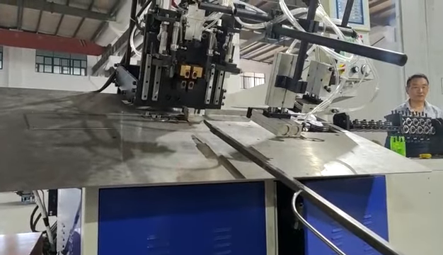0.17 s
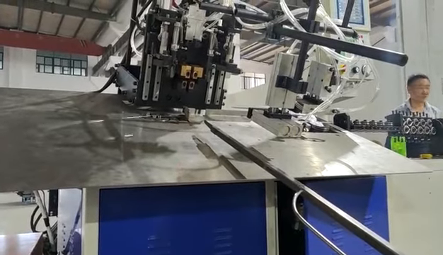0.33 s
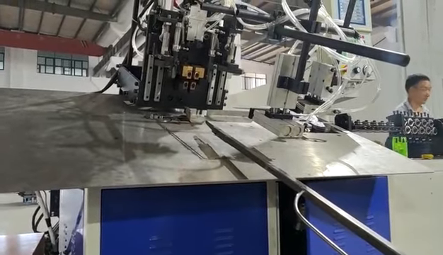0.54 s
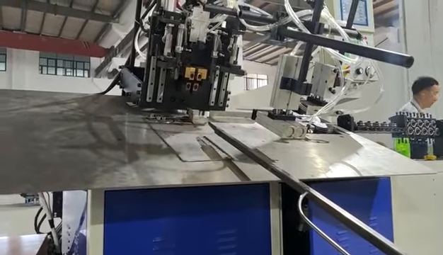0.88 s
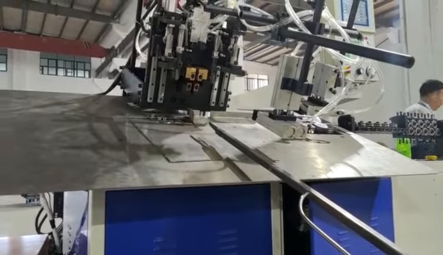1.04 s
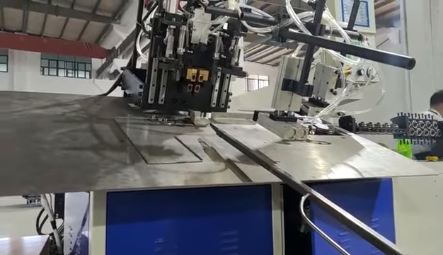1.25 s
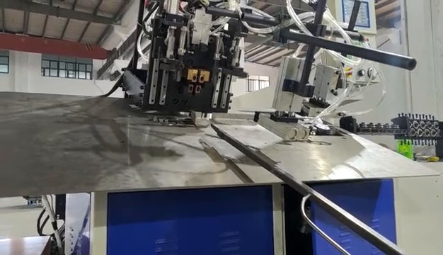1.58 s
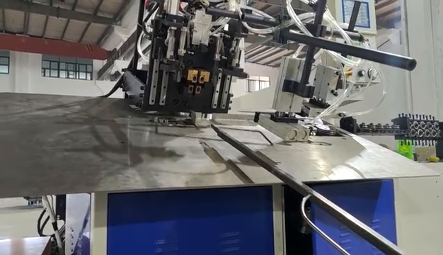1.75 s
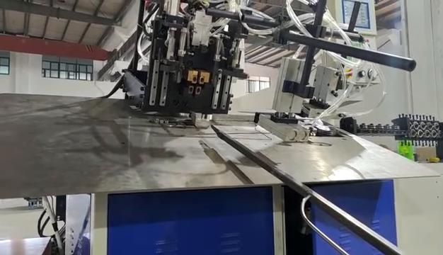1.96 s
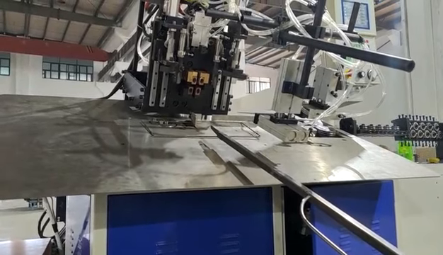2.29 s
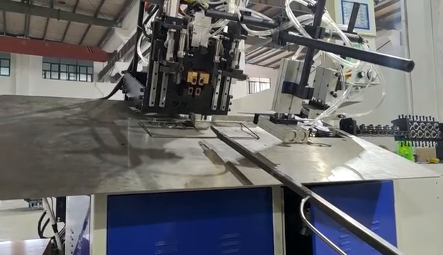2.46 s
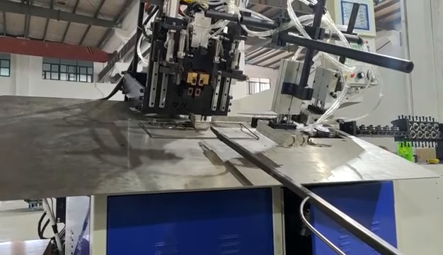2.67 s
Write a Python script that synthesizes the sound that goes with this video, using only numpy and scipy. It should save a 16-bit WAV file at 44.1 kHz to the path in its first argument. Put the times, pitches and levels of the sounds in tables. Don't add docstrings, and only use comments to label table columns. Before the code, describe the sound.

A wire bending machine clanks once early, hisses and rattles lightly, pauses, then bursts into sharp metal clinks, air puffs and thuds, ending in a falling exhaust whistle; large droning hall, dull stereo pickup nearby.

```python
import sys
import numpy as np
from scipy import signal
from scipy.fft import rfft, irfft
from scipy.io import wavfile
from scipy.ndimage import uniform_filter1d

SR = 44100
rng = np.random.default_rng(int(sys.argv[2]) if len(sys.argv) > 2 else 0)


def attenuation_scalar(level_db):
    decades = np.asarray(level_db, float) / 20
    return 10 ** decades


def dump_mix(stems):
    frames = np.atleast_2d(stems).T
    limited = np.clip(frames, -1, 1)
    pcm = np.round(limited * 32767).astype(np.int16)
    wavfile.write(sys.argv[1], SR, pcm)


N = 124803


def evened(x):
    return x / np.sqrt(np.mean(x ** 2) + 1e-20)


def read(points, hz):
    f, value = np.transpose(points)
    return np.interp(np.log(hz + 1), np.log(f + 1), value)


def sides(pan_db):
    return attenuation_scalar(np.array([[pan_db / 2], [-pan_db / 2]]))


def gate(start, rise, hold, t60):
    t = np.arange(N) / SR - start
    release = attenuation_scalar(-60 * np.maximum(t - hold, 0) / t60)
    return np.clip(t / rise, 0, 1) * release


def resonate(x, hz, width):
    turn = np.exp(2j * np.pi * np.cumsum(hz * np.ones(N)) / SR)
    r = np.exp(-np.pi * width / SR)
    smooth = signal.lfilter([1 - r], [1, -r], x / turn + 1e-18)
    return 2 * (turn * smooth).real


# frequency in Hz, left minus right in dB.
PORT_TILT = [(60, 0), (1700, -.3), (2500, 1.5), (3300, -.8), (4500, -1.5), (5500, 2), (6500, 3.5),
             (7500, 4)]
# frequency in Hz, correlation.
PORT_LIKENESS = [(30, .9995), (100, .998), (200, .968), (400, .84), (800, .4), (1550, -.38), (2100, .08),
                 (3000, -.05)]


def ports(left, other, hz):
    same = read(PORT_LIKENESS, hz)
    tilt = attenuation_scalar(read(PORT_TILT, hz) / 2)
    right = same * left + np.sqrt(1 - same ** 2) * other
    return np.array([left * tilt, right / tilt])


def wash(colour_db, size, patchy_db, flicker_db):
    frames, hz = 4 * N // size + 5, np.fft.rfftfreq(size, 1 / SR)
    a, b, c, d, patches = rng.standard_normal((5, frames, len(hz)))
    patches = uniform_filter1d(patches, size=size // 80, axis=1)
    patches = evened(uniform_filter1d(patches, size=8000 // size, axis=0))
    flicker = evened(uniform_filter1d(rng.standard_normal(frames), size=6000 // size))[:, None]
    level_db = colour_db(hz) + patchy_db * patches + flicker_db * flicker
    z = ports(a + 1j * b, c + 1j * d, hz) * attenuation_scalar(level_db)
    noise = signal.istft(z.transpose(0, 2, 1), nperseg=size, noverlap=3 * size // 4)[1]
    return evened(noise[:, :N])


# frequency in Hz, level in dB per Hz.
DRONE_COLOUR = [(30, -31.5), (65, -5), (250, -7), (700, -10.5), (1100, -13), (2200, -13.5), (4600, -19),
                (7500, -22.5)]
# frequency in Hz, width in Hz, boost in
# dB (negative for the dip).
HALL_HUMS = [(122.7, 11.7, 9.5), (270, 174, 6.5), (648, 130, 2), (1052, 270, -5)]


def drone():
    def colour_db(hz):
        hums = sum(db / (1 + (2 * (hz - f) / w) ** 2) for f, w, db in HALL_HUMS)
        return read(DRONE_COLOUR, hz) + hums
    return attenuation_scalar(-19) * wash(colour_db, size=2048, patchy_db=1.0, flicker_db=0.44)


# frequency in Hz, level in dB per Hz.
LEAK_HISS = [(1000, -12), (2500, -3), (4500, -5), (6500, 0), (7600, 1)]
# time in seconds, level in dB.
LEAK_DRIFT = [(0, -19), (0.248, -17.5), (0.649, -64.5), (.9, -16), (1.151, -20), (1.298, -25),
              (1.45, -50.5), (1.719, -53), (2.2, -41.5), (2.55, -52.5), (2.83, -59.5)]


def leak():
    s, db = np.transpose(LEAK_DRIFT)
    hiss = wash(lambda hz: read(LEAK_HISS, hz) - 60 * (hz < 700), size=512, patchy_db=1.2, flicker_db=.4)
    return hiss * attenuation_scalar(np.interp(np.arange(N) / SR, s, db)) * sides(2.5)


def flow(bursts):
    return np.sqrt(sum((attenuation_scalar(db) * gate(s, rise, hold, t60)) ** 2 for s, rise, hold, t60, db in bursts))


# frequency in Hz, level in dB per Hz.
VENT_COLOUR = [(150, -42.5), (300, -4), (700, -5.5), (1300, -8.5), (2100, -8), (3700, -3), (5000, -7),
               (7500, -8)]
# start in seconds, rise in seconds, hold in seconds,
# release t60 in seconds, level in dB.
VALVE_PUFFS = [(0.364, .03, 0.12, 0.82, -19.5), (0.542, 0.024, 0.079, 0.1, -20.5),
               (0.699, 0.019, 0.021, 0.56, -16), (1.697, 0.0018, 0.012, 0.19, -23.5),
               (1.754, 0.014, 0.04, 0.55, -15), (1.804, 0.013, 0.46, .6, -19),
               (1.991, 0.046, 0.092, 0.64, -16.5), (2.122, 0.027, 0.36, 0.41, -17.5),
               (2.327, 0.06, 0.075, 0.72, -13.5), (2.438, .01, 0.031, .2, -22), (2.633, .012, .22, .3, -17)]


def valves():
    jet = wash(lambda hz: read(VENT_COLOUR, hz) - 60 * (hz < 120), size=512, patchy_db=1.9, flicker_db=1.5)
    return jet * flow(VALVE_PUFFS) * sides(1)


# frequency in Hz, level in dB per Hz.
NOZZLE_COLOUR = [(1500, -20.5), (3000, -4), (4200, -11), (5300, -2), (6500, 16.5), (7600, -17)]
# start in seconds, rise in seconds, hold in seconds,
# release t60 in seconds, level in dB.
NOZZLE_SPITS = [
    (1.758, 0.016, 0.025, 0.34, -24),
    (1.842, .01, .03, .4, -22),
    (2.055, 0.0086, 0.039, 0.38, -26.5),
    (2.403, 0.0075, 0.028, 0.24, -30.5),
]


def spits():
    jet = wash(lambda hz: read(NOZZLE_COLOUR, hz) - 60 * (hz < 1000), size=512, patchy_db=1.8, flicker_db=1.2)
    return jet * flow(NOZZLE_SPITS)


# start in seconds, level in dB, pitch in Hz.
CYLINDER_STOPS = [(.03, -22, 270), (.188, -26.5, 333), (0.626, -23.5, 252), (0.862, -18, 102.6),
                  (2.035, -26.5, 307), (2.321, -22.5, 265), (1.698, -20, 278), (1.753, -18.5, 270),
                  (1.81, -20.5, 189), (1.95, -19, 256), (2.202, -19.5, 203), (2.4, -24.5, 270),
                  (2.52, -23.5, 240), (2.67, -22.5, 510), (2.806, -21.5, 200)]


def thuds():
    out = np.zeros(N)
    for s, db, hz in CYLINDER_STOPS:
        shake = evened(resonate(rng.standard_normal(N), hz, width=59))
        out += attenuation_scalar(db) * gate(s, 0.0044, 0.0081, t60=0.35) * shake
    return out


def near(hz, centre_hz, reach_octaves):
    return np.exp(-(np.log2(hz / centre_hz) / reach_octaves) ** 2)


# frequency in Hz, level in dB, t60 in seconds,
# left minus right in dB.
HEAD_MODES = [(1200, -4, .06, 0), (1800, -4, .06, -2), (1910, -5, .03, 0), (2020, 0, .06, 0),
              (2190, -3, .05, -1), (2350, -7, .03, 0), (2710, -5, .03, 0), (3400, -5, .04, 0),
              (3740, 2, .06, -4), (3930, -3, .05, -3), (4150, -5, .03, -2), (4370, -5, .05, -2),
              (5280, -6, .05, -3), (6900, -3, .05, -4)]
# start in seconds, length in seconds, level in dB, pitch struck in Hz.
HEAD_RATTLES = [(0.49, 0.14, -33, 2400), (0.77, 0.06, -33, 4100), (.43, 0.049, -34, 4500),
                (.715, .04, -32, 2900), (1.3, 0.022, -40, 3500), (0.732, 0.023, -34, 2200),
                (2, 0.055, -26, 2700), (1.7, 0.12, -29.5, 2300), (2.0, 0.096, -30.5, 4800),
                (4.1, 0.091, -38, 2200), (2.368, 0.15, -32, 9500), (2.1, 0.054, -23, 2600),
                (1.9, 0.15, -30, 4200), (2.616, .21, -24, 2240), (2.634, 0.11, -21.5, 1220),
                (7.1, 0.064, -31, 5900), (2.744, 0.091, -36, 1180)]


def heads():
    knocks_per_s, spread_db, longest_ring_s = 260, 1, .04
    strength = attenuation_scalar(spread_db * np.minimum(rng.exponential(1, N), 3))
    knocks = strength * (rng.random(N) < knocks_per_s / SR)
    knocks = evened(knocks * rng.choice([-1, 1], N))
    t = np.arange(SR // 4) / SR
    chatter = [attenuation_scalar(db) * gate(s, 0.0045, length, 0.11) for s, length, db, _ in HEAD_RATTLES]
    out = np.zeros((2, N))
    for hz, db, t60, pan in HEAD_MODES:
        force = sum(g * near(hz, row[3], .29) for g, row in zip(chatter, HEAD_RATTLES))
        ring = attenuation_scalar(-60 * t / min(t60, longest_ring_s)) * np.sin(2 * np.pi * hz * t)
        ring = ring / np.linalg.norm(ring)
        shuffled = np.roll(knocks, rng.integers(N)) * .8 + knocks
        out += 0.67 * attenuation_scalar(db) * sides(pan) * signal.oaconvolve(shuffled * force, ring)[:N]
    return out


# frequency in Hz, level in dB, t60 in seconds.
TOOL_MODES = [(2640, 0, .12), (2800, -4, .04), (2960, -3, .05), (3330, -3, .05), (3490, -2, .04),
              (3680, -4, .03), (5450, -4, .04), (5750, -4, .04), (6050, -3, .04), (6310, -3, .06)]
# time in seconds, peak in dB, pitch struck in Hz.
SINGLE_BLOWS = [(0.112, -15.5, 2620), (0.115, -2, 3440), (.118, -12.5, 3540), (0.12, -10.5, 6200),
                (0.122, -20.5, 3040), (.133, -12, 2760), (.134, -14, 3750), (0.329, -15.5, 2990),
                (0.323, -19, 6050), (.332, -15.5, 6350), (0.412, -20, 3770), (0.53, -19.5, 3420),
                (0.542, -13.5, 6460), (0.546, -13, 3010), (0.547, -13.5, 3280), (.548, -15.5, 5380),
                (0.558, -21.5, 3240), (0.715, -16, 3440), (0.721, -24.5, 4400), (0.757, -19.5, 3180),
                (.798, -26, 1920), (1.7, -19.5, 1980), (1.764, -16.5, 6500), (1.771, -9, 4000),
                (1.771, -13.5, 6800), (1.775, -17, 2880), (1.789, -2.5, 4160), (1.815, -8, 3870),
                (1.817, -17, 2020), (1.83, -16.5, 3880), (1.845, -13, 5840), (2.012, -16, 3700),
                (2.013, -13.5, 2020), (2.036, -27, 3640), (2.036, -20, 2710), (2.047, -17, 3660),
                (2.054, -13.5, 1800), (2.084, -2.5, 3910), (2.086, -18.5, 5280), (2.101, -12, 2120),
                (2.106, -21.5, 6500), (2.345, -24, 3740), (2.393, -11, 2020), (2.395, -12, 7050),
                (2.399, -14.5, 2110), (2.416, -17, 1910), (2.431, -25.5, 2240), (2.454, -21.5, 2120),
                (2.756, -15, 1960), (2.793, -28, 2030), (2.813, -23, 2160)]


def clinks():
    blow_s, damping = .0008, .45
    s, peak_db, pitch = np.transpose(SINGLE_BLOWS)
    modes = np.array(TOOL_MODES + [row[:3] for row in HEAD_MODES])
    share = attenuation_scalar(modes[:, 1:2]) * near(modes[:, :1], pitch, .12)
    share = share / share.sum(0)
    t = np.arange(SR // 8) / SR
    out = np.zeros(N)
    for (hz, _, t60), part in zip(modes, share):
        force = np.bincount((s * SR).astype(int), part * attenuation_scalar(peak_db), N)
        ring = (1 - np.exp(-t / blow_s)) * attenuation_scalar(-60 * t / (t60 * damping)) * np.sin(2 * np.pi * hz * t)
        out += signal.oaconvolve(force, ring)[:N]
    return attenuation_scalar(10.5) * out * sides(0.4)


# frequency in Hz, level in dB.
SILENCER_MODES = [(6094, 6.5), (6266, -9.5), (6525, -1), (6724, 0), (6891, -5), (7074, -3.5), (7290, 3),
                  (7488, -0.5)]


def whistle():
    start_s, top_hz, end_hz, sag_s, width_hz = 2.617, 7700, 6200, .11, 950
    t = np.maximum(np.arange(N) / SR - start_s, 0)
    hz = end_hz + (top_hz - end_hz) * np.exp(-t / sag_s)
    jet = resonate(rng.standard_normal((2, N)), hz, width_hz)
    jet = resonate(jet, hz, width_hz)
    rings = sum(attenuation_scalar(db) * resonate(jet, f, width=60) for f, db in SILENCER_MODES)
    tone = evened(evened(jet) + attenuation_scalar(-3) * evened(rings))
    swell = attenuation_scalar(-20 + 0.5 * t)
    return swell * gate(start_s, .015, 1, 1) * tone * sides(3.5)


def space(x):
    echo_t60_s, echo_db, hall_t60_s, hall_db = .06, -3, .9, -11
    port_lag_s, direct_db = .00008, -.5
    t = np.arange(SR) / SR
    taps = rng.standard_normal((2, SR)) * (rng.random((2, SR)) < 2000 / SR)
    quick = taps * attenuation_scalar(-60 * t / echo_t60_s)
    far = taps[::-1] * attenuation_scalar(-60 * t / hall_t60_s) * np.minimum(t / 0.017, 1)
    both = attenuation_scalar(echo_db) * quick / np.linalg.norm(quick[0]) + attenuation_scalar(hall_db) * far / np.linalg.norm(far[0])
    tail = irfft(ports(*rfft(both), np.fft.rfftfreq(SR, 1 / SR)), SR)
    direct = np.array([x[0], np.roll(x[1], round(port_lag_s * SR))])
    return 0.81 * (attenuation_scalar(direct_db) * direct + signal.fftconvolve(x, tail, axes=1)[:, :N])


def scene():
    machine = heads() + clinks() + whistle()
    return drone() + leak() + valves() + spits() + thuds() + space(machine)


def low_pass(x):
    return signal.sosfilt(signal.butter(12, 7560, fs=SR, output="sos"), x)


def record(dry):
    return low_pass(dry)


dry = scene()
out = record(dry)
dump_mix(out)
```